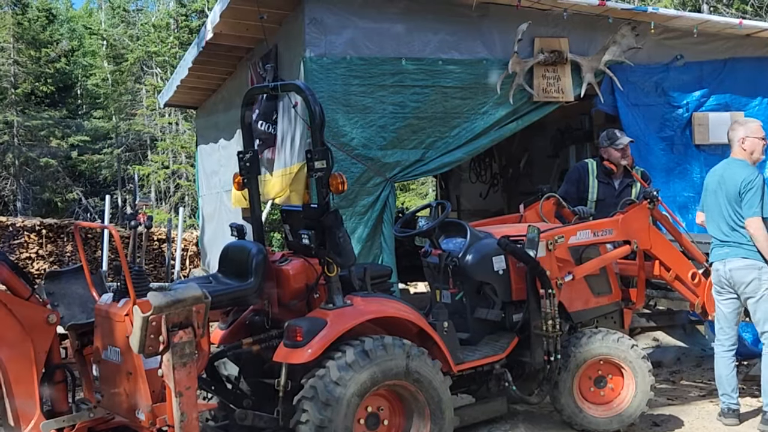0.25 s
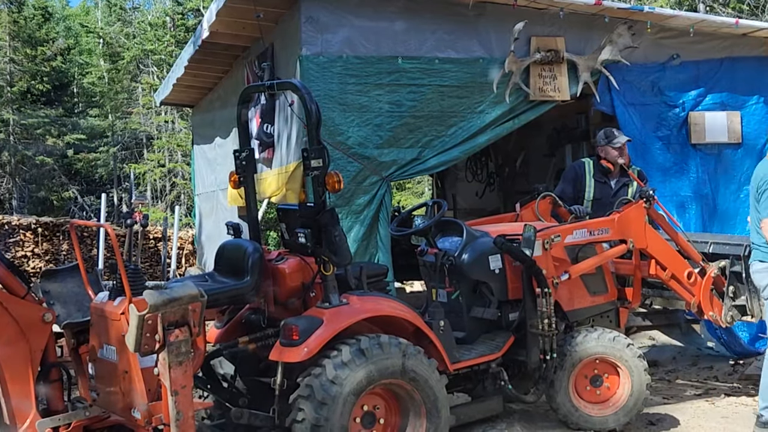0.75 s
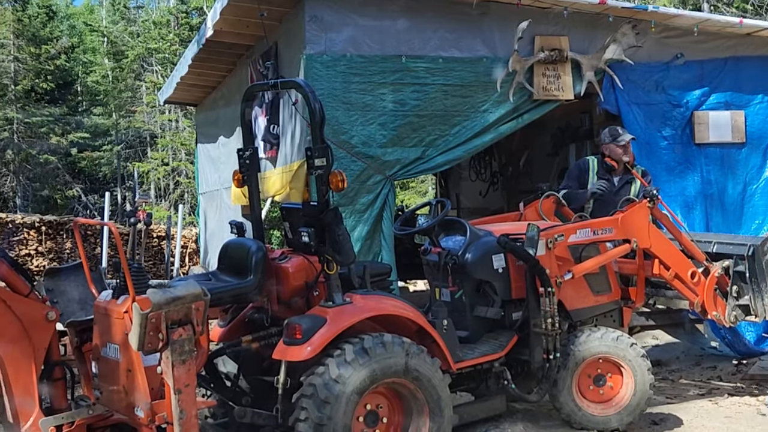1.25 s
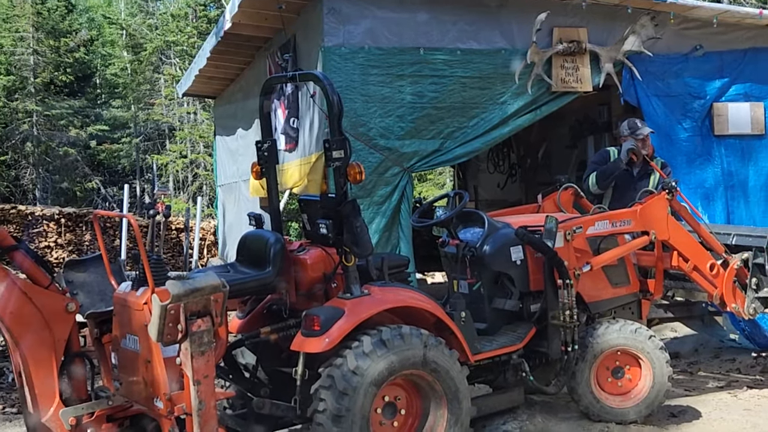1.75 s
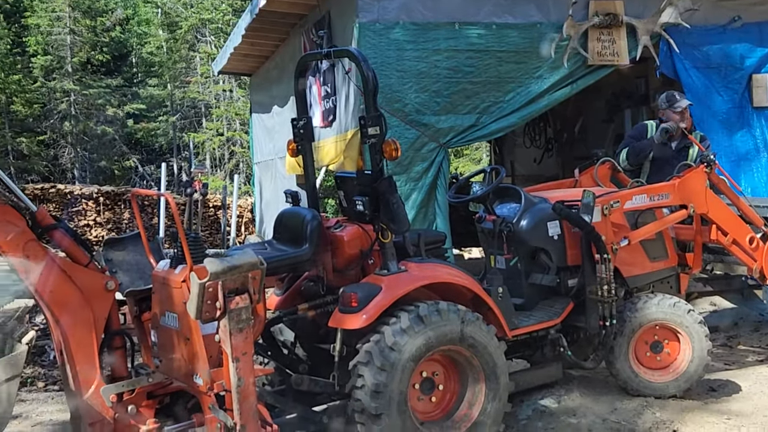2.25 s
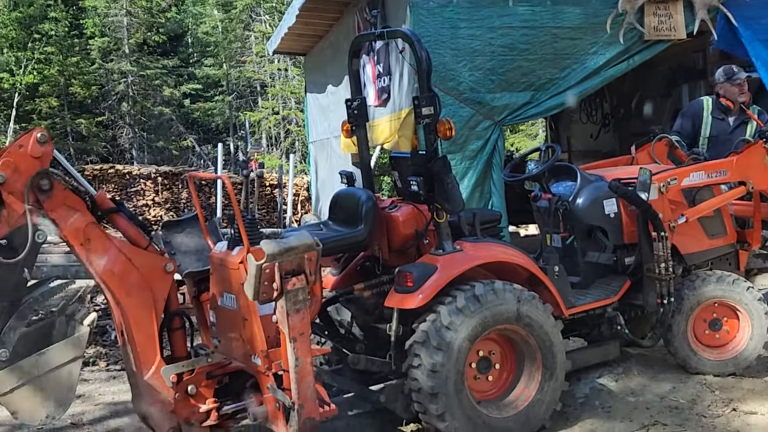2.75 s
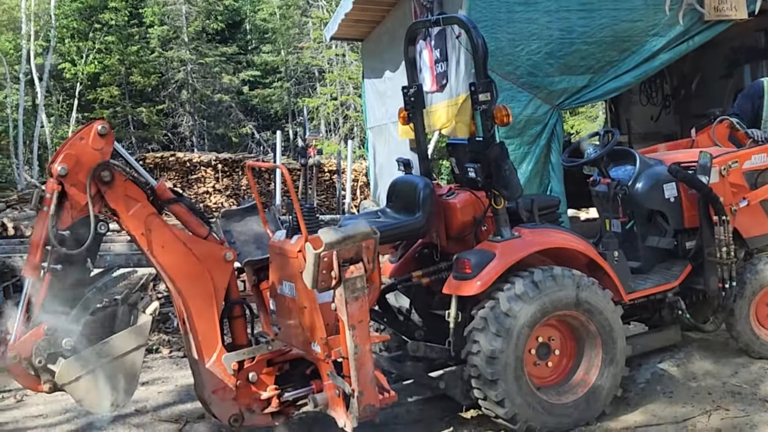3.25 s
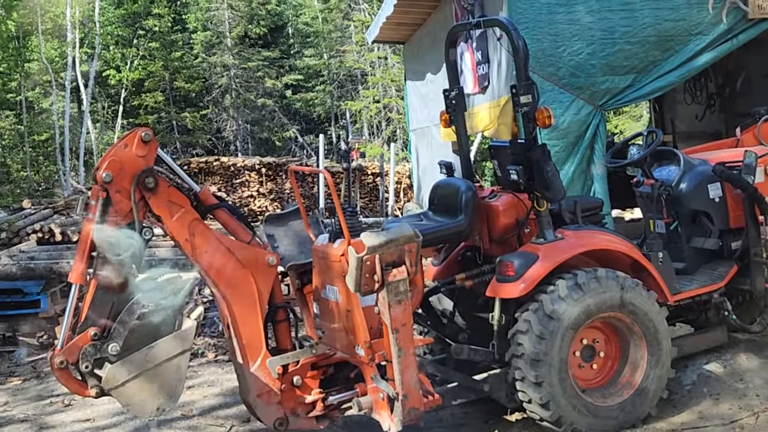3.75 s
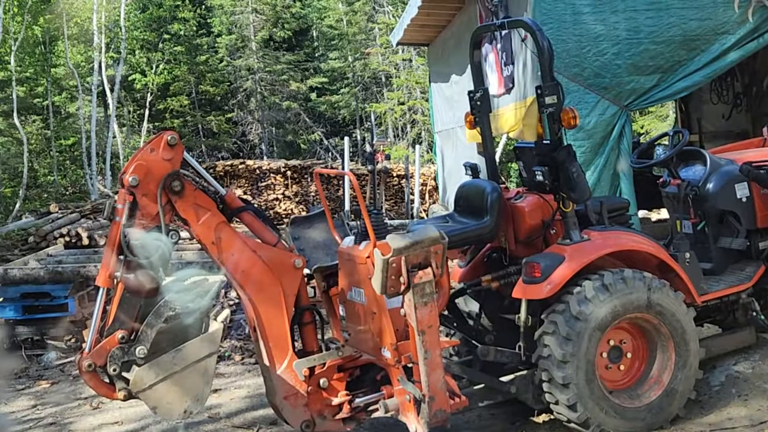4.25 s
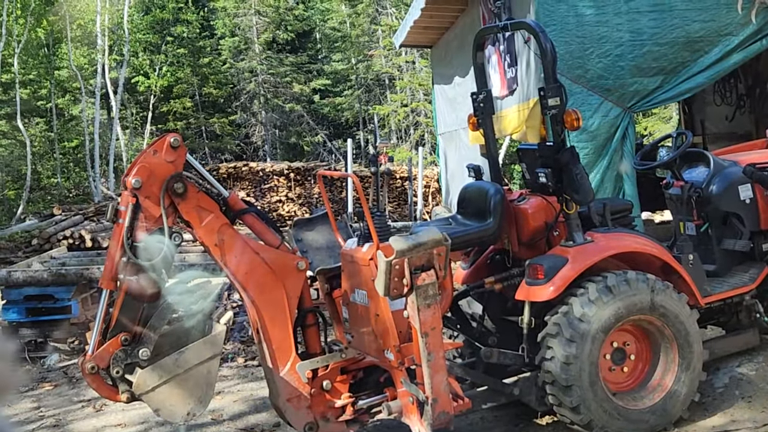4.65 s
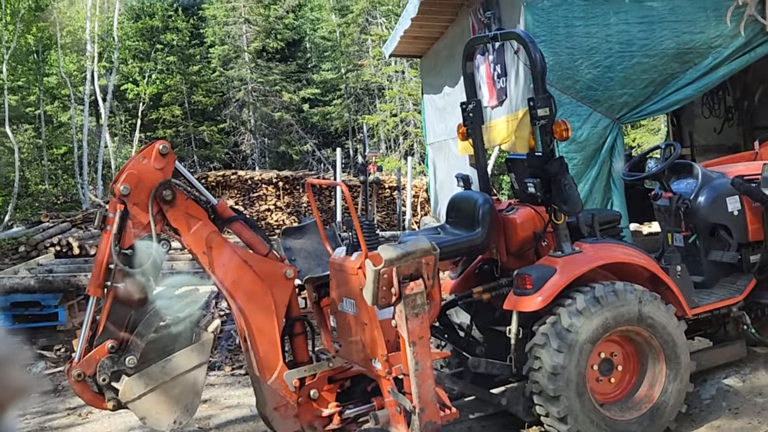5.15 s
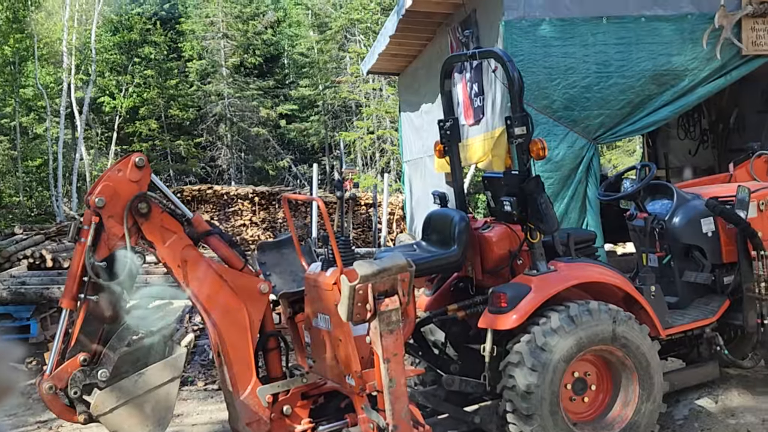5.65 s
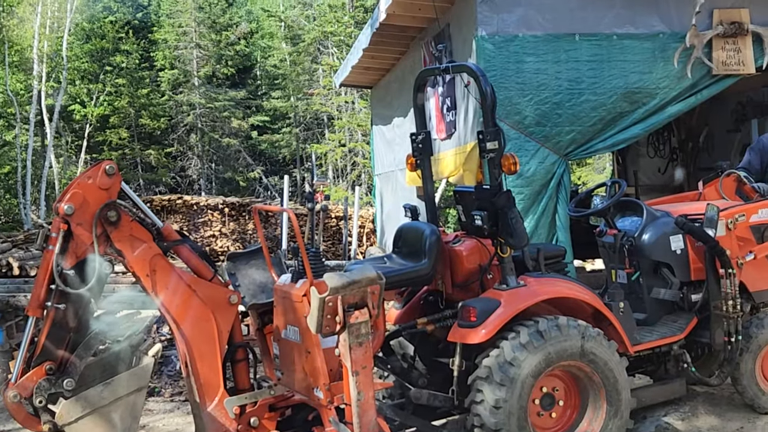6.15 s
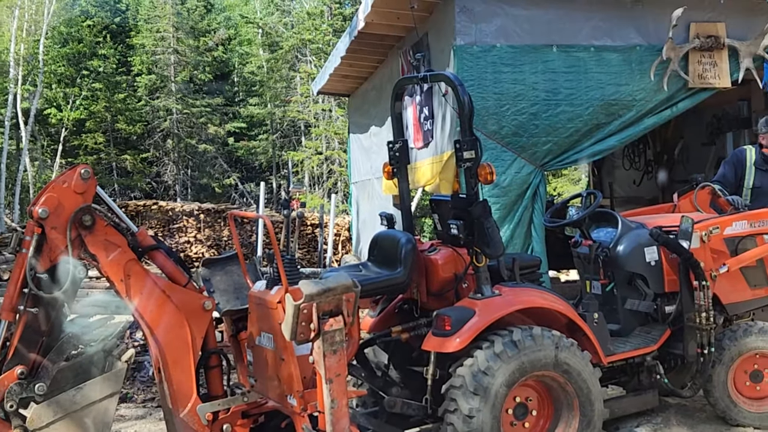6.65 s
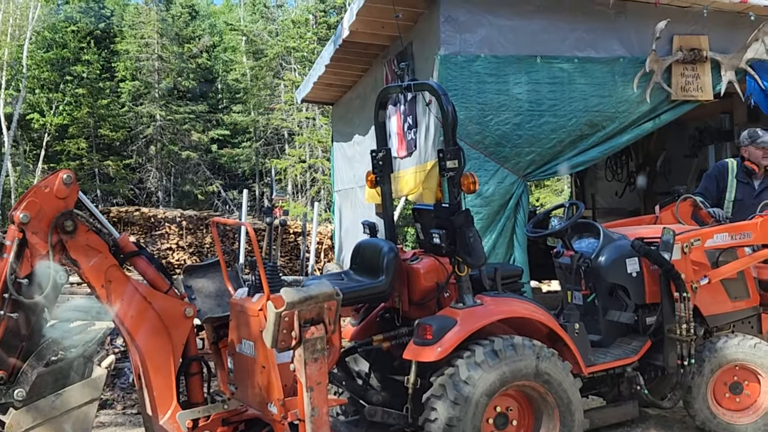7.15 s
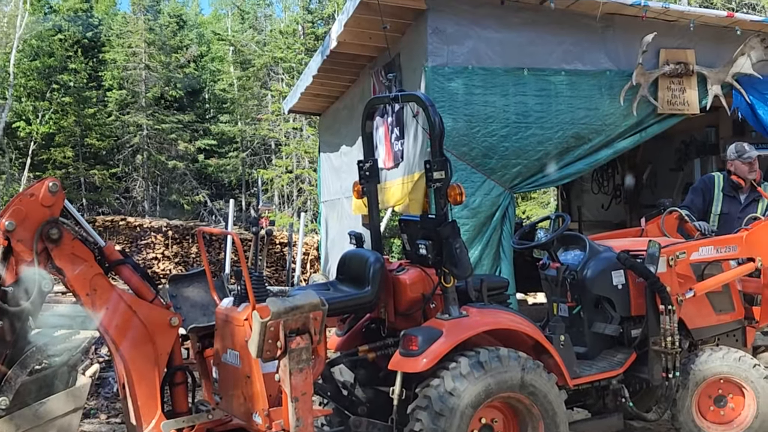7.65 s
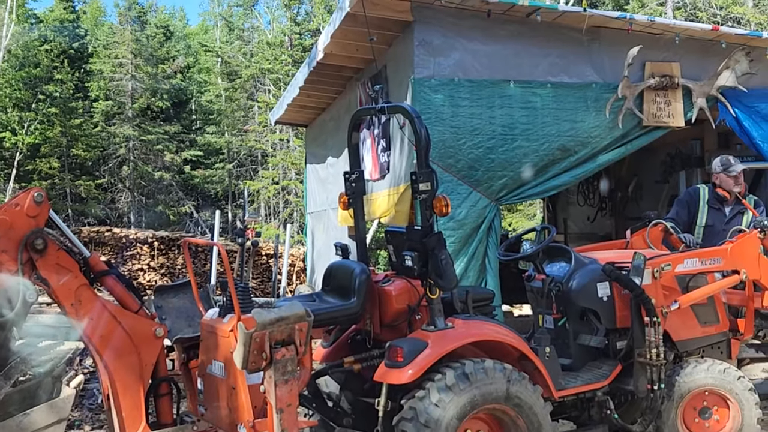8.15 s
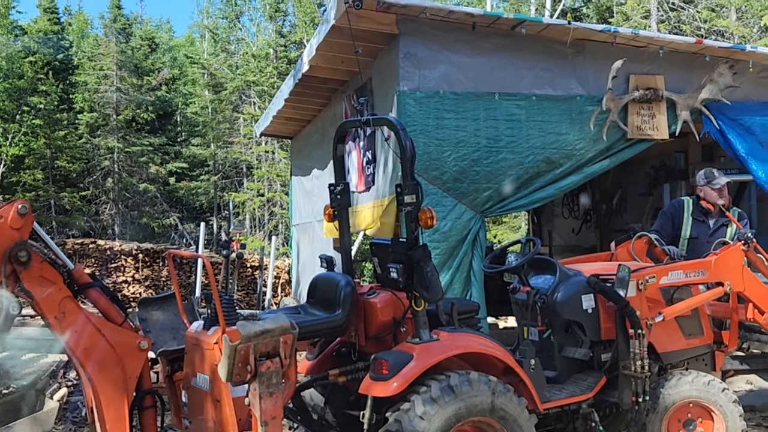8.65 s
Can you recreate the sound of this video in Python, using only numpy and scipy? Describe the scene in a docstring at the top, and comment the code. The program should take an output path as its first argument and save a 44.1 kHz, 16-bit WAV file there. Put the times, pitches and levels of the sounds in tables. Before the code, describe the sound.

Outdoors, a compact tractor's diesel engine roars evenly, bodywork rattling, with dull wind thumps on the left and faint hiss flaring briefly.

```python
"""A small diesel machine roars steadily beside a shed, off to the left of a hand-held phone with two ports.
Resonant noise and faint firing lines make a low rumble, whose bass keeps ducking and returning on the left.
Even noise, slightly roughened by sparse random clicks, rings bodywork and shed as a smeared clatter, changing
colour as the phone turns; a panel rings to a few knocks. Wind thumps the left port with short sinking pulses
and brushes the right once with low noise; a thin band of noise hisses and flares up briefly."""
import sys
import numpy as np
from scipy import signal
from scipy.fft import rfft, irfft, next_fast_len
from scipy.io import wavfile
from scipy.ndimage import uniform_filter1d

SR = 44100
rng = np.random.default_rng(int(sys.argv[2]) if len(sys.argv) > 2 else 0)


def dump(signal):
    """Clip the signal to [-1, 1] and save it as 16-bit WAV at the path in sys.argv[1]."""
    limited = np.clip(np.atleast_2d(signal).T, -1, 1)
    pcm = np.round(limited * 32767).astype(np.int16)
    wavfile.write(sys.argv[1], SR, pcm)


N = 392931
SIZE = next_fast_len(N)
HZ = np.arange(SIZE // 2 + 1) * SR / SIZE
TIME = np.arange(N) / SR

# hiss level at the right port; its flares also lift the rattle: start_s, level_db
HISS_LEVEL = [(0, -84.5), (1.9, -86), (2.12, -81.5), (2.25, -86.5), (2.48, -84.5), (2.58, -80),
              (3.16, -79.5), (3.23, -85), (3.4, -82.5), (3.69, -81), (3.74, -88), (5.3, -87.5), (5.92, -86),
              (6.05, -86), (8.91, -86.5)]
HISS_CALM_DB = -85
# phase by which the left port leads: freq_hz, lead_rad
LEFT_LEAD_PHASE = [(0, 0), (690, 1.34), (990, 1.1), (1075, 2), (1150, 1.6), (1220, 3), (1312, 1.0),
                   (1380, 3.5), (1640, 4.5), (2330, 7), (2580, 8), (3010, 11), (3620, 11), (4390, 15),
                   (6290, 19), (7670, 16.5), (9220, 20.5), (13300, 20.5), (15200, 23.5)]


def amp(db):
    """dB to gain."""
    return 10 ** (np.asarray(db) / 20)


def curves(table):
    """The columns of a table, after the time column, at every sample."""
    s, *columns = np.transpose(table)
    return [np.interp(TIME, s, column) for column in columns]


def noise():
    """Spectrum of white noise."""
    return rfft(rng.standard_normal(SIZE))


def play(spectrum):
    """Sound of a spectrum, rms 1 over all its channels."""
    x = irfft(spectrum, SIZE)[..., :N]
    return x / np.sqrt(np.mean(x ** 2))


def peak(hz, width_hz):
    """Power response of a resonance applied twice."""
    return 1 / (1 + (2 * (HZ - hz) / width_hz) ** 2) ** 2


def colour(points):
    """Gains along (Hz, dB, dB ..) points, one for each dB column, silent outside them."""
    hz, *dbs = np.transpose(points)
    return amp([np.interp(np.log(HZ + 1), np.log(hz), db, left=-200, right=-200) for db in dbs])


def walk(rate_hz):
    """Random levels held for 1 / rate_hz and slewed twice; spread near 1."""
    hold = int(SR / rate_hz)
    steps = np.repeat(rng.standard_normal(N // hold + 1), hold)
    return 1.3 * uniform_filter1d(uniform_filter1d(steps, hold), hold)[:N]


def ports(db, open_db, share, lead_s):
    """Left and right gains: right at db; left open_db over it, falling at once in ducks and creeping back."""
    # left bass ducks, depth before each layer's share: start_s, length_s, depth_db
    duck_events = [(0.154, 0.55, 6), (0.962, 0.48, 6.5), (1.595, 0.2, 5), (2.14, 1.46, 6.5),
                   (4.144, 0.18, 4.5), (4.366, 0.14, 7), (4.771, 0.74, 6), (5.93, 0.29, 6),
                   (6.424, 0.34, 4.5), (7.18, 0.16, 3), (7.807, 0.23, 4.5), (8.161, 0.3, 6),
                   (8.52, 0.62, 5.5)]
    fall_s, rise_s = 0.012, 0.099
    duck_db = np.zeros(N)
    for start_s, length_s, depth_db in duck_events:
        end_s = start_s + max(length_s - lead_s, 2 * fall_s)  # lead_s: how much earlier the layer is back
        knee_s = max(end_s - rise_s, start_s + fall_s)
        shape = np.interp(TIME, [start_s, start_s + fall_s, knee_s, end_s], [0, 1, 1, 0])
        duck_db = np.maximum(duck_db, depth_db * shape)
    return amp(db + np.array([open_db - share * duck_db, np.zeros(N)]))


def even(x):
    """Divides out part of the chance swells that the two ports share."""
    evenness, span_s = 0.23, 0.082
    swell = uniform_filter1d(np.mean(x ** 2, axis=0), int(span_s * SR))
    x = x / (swell + 0.018) ** (evenness / 2)
    return x / np.sqrt(np.mean(x ** 2))


def rumble():
    """Turbulent noise rings low resonances; both ports hear nearly the same pressure."""
    # deep rumble at the right port: start_s, level_db
    deep_level = [(0.03, -28), (0.12, -31.5), (0.3, -35.5), (0.82, -30), (1.0, -35.5), (1.25, -29),
                  (1.6, -33.5), (2.02, -27.5), (2.22, -35.5), (2.45, -29.5), (2.7, -35), (2.95, -30),
                  (3.4, -33.5), (4.15, -30.5), (4.34, -26), (4.41, -31), (4.51, -30), (4.62, -35.5),
                  (4.75, -29), (5.0, -32), (5.75, -30.5), (5.95, -32), (6.7, -33.5), (6.85, -27),
                  (7.05, -31), (7.17, -28.5), (7.3, -33), (7.7, -28.5), (7.9, -34), (8.91, -32)]
    # deep resonances, the first two the lowest: freq_hz, width_hz, gain_db
    deep_modes = [(37, 9.2, -14), (53.6, 13, -8), (67.3, 12, 0), (85.7, 19, 3.5), (101.4, 15, -2.5),
                  (113.2, 11, 0), (130.3, 14.1, -4.5)]
    # upper resonances: freq_hz, width_hz, gain_db
    upper_modes = [(166.6, 32.4, 0.5), (188.4, 24, -2), (210.5, 24, -5.5), (234.7, 35.4, -3),
                   (269.6, 52, -15.5)]
    # likeness of the two ports: freq_hz, likeness_0_to_1
    port_likeness = [(25, 0.9), (45, 0.6), (65, 0.93), (130, 0.93), (250, 0.87)]
    lowest_db, upper_mean_db = -10, -43  # lowest is relative to deep
    upper_follows = 0.18  # share of the deep swells
    # open_db, duck share, lead_s
    lowest_duck, deep_duck, upper_duck = (6.6, 2.2, 0.001), (2.93, 1.08, 0.001), (1.3, 0.54, 0.041)

    deep_db, = curves(deep_level)
    upper_db = upper_mean_db + upper_follows * (deep_db - deep_db.mean())
    alike = np.clip(np.interp(HZ, *np.transpose(port_likeness)), 0, 1)
    shared = noise()
    push = np.array([shared, alike * shared + np.sqrt(1 - alike ** 2) * noise()])

    def ring(modes):
        """The push through a set of resonances, summed in power."""
        power = sum(amp(db) ** 2 * peak(hz, width_hz) for hz, width_hz, db in modes)
        return even(play(push * np.sqrt(power)))

    lowest = ring(deep_modes[:2]) * ports(deep_db + lowest_db, *lowest_duck)
    deep = ring(deep_modes[2:]) * ports(deep_db, *deep_duck)
    upper = ring(upper_modes) * ports(upper_db, *upper_duck)
    return lowest + deep + upper


def tones():
    """Multiples of a slightly wandering firing rate, and a steady-pitched hum; both duck on the left."""
    # firing lines at the right port: multiple_of_firing_rate, level_db
    firing_orders = [(1, -49.5), (2, -37.5), (3, -43.5), (4, -52), (6, -56.5), (7, -58)]
    # hum at the right port: start_s, level_db
    hum_level = [(0, -40.5), (2, -46), (4, -40), (4.3, -44), (8.91, -51.5)]
    firing_hz, hum_hz = 34.87, 40
    lines_open_db, hum_open_db = 4, -3.5
    duck_share, lead_s = 1.42, 0.001

    firing_rad = 2 * np.pi * np.cumsum(firing_hz * (1 + 0.0015 * walk(1))) / SR
    lines = sum(amp(db + walk(2.2)) * np.sin(order * firing_rad + 2 * np.pi * rng.random())
                for order, db in firing_orders)
    hum = amp(curves(hum_level)[0]) * np.sin(2 * np.pi * hum_hz * TIME)
    both = lines * ports(0, lines_open_db, duck_share, lead_s) + hum * ports(0, hum_open_db, duck_share, lead_s)
    return np.sqrt(2) * both  # levels are rms


def grainy_noise():
    """Spectrum of even noise with sparse random clicks that roughen it slightly."""
    clicks_per_s, clicks_db = 250, -9.5  # power beside the even noise
    hits = rng.random(SIZE) < clicks_per_s / SR
    clicks = hits * rng.standard_normal(SIZE) * np.sqrt(SR / clicks_per_s)
    return noise() + amp(clicks_db) * rfft(clicks)


def clatter():
    """Grainy noise rings bodywork and shed; the right port hears the direct share later, the rest is its own."""
    # bodywork and shed resonances, facing the shed and turned away:
    # freq_hz, width_hz, facing_left_db, facing_right_db, away_left_db, away_right_db, likeness_0_to_1
    body_modes = [(399.5, 206, -1.5, 0, 0, 0.5, 0.54), (527, 66, -7.5, -1, -2, -3, 0.78),
                  (660.5, 147, -1.5, -1.5, -1, -1, 0.78), (761, 50, 2, 2, -0.5, 0, 0.89),
                  (821, 32, -14.5, -12, -10, -8, 0.88), (898, 80, -1, -2.5, -6.5, -8.5, 0.94),
                  (997, 92, -2, -0.5, -7.5, -3.5, 0.75), (1139, 170, -7, -6.5, -2.5, -7.5, 0.33),
                  (1260, 84, -8, 2, -6.5, -2.5, 0.69), (1308, 38, 0, -1.5, -7.5, -10.5, 0.89),
                  (1368, 60, -0.5, -11.5, -4, -9, 0.63), (1465, 46, -3, -5, -9, -7.5, 0.5),
                  (1530, 480, -17, -12, -14.5, -12, 0.29), (1558, 100, -9.5, -6.5, -8.5, -8, 0.45),
                  (1800, 510, -18.5, -18.5, -20, -15, 0.89), (1904, 170, -15.5, -12.5, -12.5, -12, 0.33),
                  (2035, 120, -14, -16, -11.5, -14.5, 0.2), (2180, 260, -21.5, -23.5, -18.5, -28, 0.51),
                  (2315, 210, -20, -16.5, -18.5, -16.5, 0.45), (2464, 70, -17, -17, -20.5, -16, 0.44),
                  (2550, 45, -19.5, -23, -28, -14.5, 0.66), (2720, 260, -18.5, -23, -17, -14, 0.46),
                  (2910, 110, -21, -21.5, -18.5, -21, 0.39), (3016, 61, -29, -21.5, -28, -21.5, 0.37),
                  (3160, 320, -24, -24.5, -26, -26.5, 0.19), (3470, 150, -23, -20.5, -23, -24, 0.28),
                  (3695, 435, -25, -28.5, -25.5, -20.5, 0.33), (4000, 380, -31, -22, -28, -27.5, 0.18),
                  (4240, 130, -28, -34.5, -24.5, -28.5, 0.38), (4300, 140, -27.5, -26, -27.5, -29, 0.37),
                  (4516, 280, -32, -28, -32, -29.5, 0.05), (4790, 440, -33, -35, -34, -31.5, 0.12),
                  (5320, 950, -34, -33, -33.5, -38, 0.25)]
    # narrow bands altered by echoes: freq_hz, width_hz, left_db, right_db
    echo_dips = [(367, 34, -3, 0.5), (481, 46, -3.5, -4.5), (616, 37, -3, -3), (1190, 37, -2.5, -0.5),
                 (1363, 47, -1.5, -2), (1512, 37, -6, -5.5), (2310, 79, -1.5, -3.5), (2800, 50, -5, -3.5)]
    # the phone swings round: start_s, turn_0_facing_to_1_away
    phone_turn = [(0, 0.36), (2.2, 0.2), (3.6, 0.92), (8.91, 0.73)]
    split_hz, rattle_hz = 900, 2200
    # right port: facing_db, away_db
    low_levels, high_levels, rattle_levels = (-53, -53.5), (-57.5, -59), (-63, -62)
    rattle_follows = 0.33  # share of the hiss flares
    # open_db, duck share, lead_s
    low_duck, high_duck, rattle_duck = (1.8, 0.5, 0.052), (0.67, 0.15, 0.08), (0.09, 0.033, 0.08)

    hz, width_hz, *dbs, alike = np.transpose(body_modes)
    peaks = np.array([peak(f, w) for f, w in zip(hz, width_hz)], dtype=np.float32)
    power = amp(np.array(dbs)) ** 2 @ peaks
    dips = amp(sum(np.outer([left_db, right_db], peak(f, w)) for f, w, left_db, right_db in echo_dips))
    direct = np.clip(np.interp(HZ, hz, alike), 0, 1)
    lag = np.exp(-1j * np.interp(HZ, *np.transpose(LEFT_LEAD_PHASE)))
    shared = grainy_noise()
    push = dips * np.array([shared, direct * lag * shared + np.sqrt(1 - direct ** 2) * noise()])
    spectra = np.sqrt(power).reshape(2, 2, -1) * push  # facing or away, left or right

    low_share = 1 / (1 + (HZ / split_hz) ** 6)
    rattle_share = 1 - 1 / (1 + (HZ / rattle_hz) ** 6)
    high_share = 1 - low_share - rattle_share
    turn, = curves(phone_turn)

    def turned(facing, away):
        """Crossfade as the phone turns."""
        return (1 - turn) * facing + turn * away

    low, high, rattle = (turned(*play(spectra * share)) for share in (low_share, high_share, rattle_share))
    low_db = turned(*low_levels) + 0.43 * walk(30)
    high_db = turned(*high_levels) + 0.98 * walk(25)
    flare_db = curves(HISS_LEVEL)[0] - HISS_CALM_DB
    rattle_db = turned(*rattle_levels) + rattle_follows * flare_db + 0.7 * walk(22)
    return (low * ports(low_db, *low_duck) + high * ports(high_db, *high_duck)
            + rattle * ports(rattle_db, *rattle_duck))


def pair():
    """Spectra of noise that the ports partly share, later on the right."""
    alike = 0.45
    shared = noise()
    lag = np.exp(-1j * np.interp(HZ, *np.transpose(LEFT_LEAD_PHASE)))
    return np.array([shared, alike * lag * shared + np.sqrt(1 - alike ** 2) * noise()])


def hiss():
    """Two bands of fine noise, stronger on the left when calm; flicker is mostly right and grows with flares."""
    # main band: freq_hz, left_db, right_db
    band_colour = [(5500, -12.5, -10), (6160, 0, -2), (6660, -4.5, -1), (7370, 2.5, 1.5), (8000, 1, -5.5),
                   (8550, -1.5, 1), (9140, -18, -7), (9500, -28, -16.5)]
    # top band: freq_hz, left_db, right_db
    top_colour = [(8000, -17, -23), (9200, -3.5, -2), (9720, -4.5, -1), (11500, 1, 3.5), (13500, 1.5, -2),
                  (16000, 4.5, -2.5)]
    band_pan_db, top_pan_db = 11.5, 4.5  # left over right, calm
    left_follows = 0.64  # left share of the band's flares
    top_calm_db = -88

    right_db, = curves(HISS_LEVEL)
    flare_db = right_db - HISS_CALM_DB
    band, top = (play(colour(points) * pair()) for points in (band_colour, top_colour))
    flicker_db = (1.8 + 0.03 * np.clip(flare_db, 0, 10)) * walk(35)
    left_db = HISS_CALM_DB + band_pan_db + left_follows * flare_db
    band = band * amp([left_db, right_db])
    top = top * amp(top_calm_db + flare_db + np.array([[top_pan_db], [0]]))
    return (band + top) * amp(np.outer([0.4, 1.1], flicker_db))


def knocks():
    """Each engine knock swells quickly and rings out in a panel, never quite at the same pitch."""
    # knocks, pan is left over right: start_s, gain_db, pan_db
    knock_events = [(0.043, -56, 4), (0.166, -46, 0.0), (0.31, -43, -0.5), (1.087, -44, -5),
                    (1.285, -47.5, 0), (1.465, -53, 4), (2.104, -45, -4.0), (3.009, -46, -4),
                    (3.301, -55, 0.5), (3.883, -47, 1), (5.355, -43, 1), (5.774, -53, 2.5), (5.833, -55, 5),
                    (6.249, -50, 5), (7.38, -51, 2)]
    # panel modes, ring is the time to fall 60 dB: freq_hz, gain_db, ring_s
    panel_modes = [(754, 0, 0.1), (644, -12, .04), (1330, -12, .05)]
    rise_s, pitch_spread = 0.0036, 0.012  # spread as a fraction of pitch

    out, t = np.zeros((2, N + SR)), TIME[:SR // 4]
    onset = 1 - np.exp(-t / rise_s)
    chance = rng.standard_normal((len(knock_events), len(panel_modes)))
    for (start_s, db, pan_db), shifts in zip(knock_events, chance):
        ring = np.zeros(len(t))
        for (hz, mode_db, ring_s), shift in zip(panel_modes, shifts):
            pitch_hz = hz * (1 + pitch_spread * shift)
            ring += amp(mode_db - 60 * t / ring_s) * np.sin(2 * np.pi * pitch_hz * t)
        start = int(start_s * SR)
        gains = amp(db + np.array([pan_db, -pan_db]) / 2)
        out[:, start:start + len(t)] += np.outer(gains, ring * onset)
    return out[:, :N]


def thumps():
    """Wind slaps the left port: a cycle or two round a sharp dip, sinking in pitch as it fades."""
    # thumps, timed and pitched at the dip, gain before colouring: dip_s, gain_db, pitch_hz
    thump_events = [(0.142, -15, 183), (0.939, -15, 171), (1.494, -18.5, 121), (1.924, -20, 140),
                    (2.012, -16, 100), (3.626, -22.5, 170), (4.116, -23, 140.5), (4.353, -24.5, 121),
                    (4.512, -19, 130.4), (4.739, -14, 169), (5.216, -29, 260), (5.478, -19, 165),
                    (5.558, -18, 138), (5.821, -13.5, 99.4), (6.23, -16, 130.6), (6.286, -18.5, 109.5),
                    (6.323, -16.5, 109), (6.437, -24.5, 170), (6.82, -18, 89.7), (7.166, -13.5, 105),
                    (7.719, -13, 95), (8.029, -18, 139)]
    # thump colour: freq_hz, gain_db
    thump_colour = [(10, -0.5), (240, 1), (300, -8), (380, 3), (600, -8), (2000, -21)]
    rise_cycles, fade_cycles = 0.44, 1.3
    sag_per_cycle, right_db = 0.64, -28  # right relative to left

    out = np.zeros(N)
    for dip_s, db, hz in thump_events:
        near = slice(int((dip_s - 0.04) * SR), int((dip_s + 0.04) * SR))
        cycles = (TIME[near] - dip_s) * hz
        envelope = np.exp(-(cycles / np.where(cycles < 0, rise_cycles, fade_cycles)) ** 2)
        sagged = cycles / (1 + sag_per_cycle * np.clip(cycles, 0, None))
        out[near] += amp(db) * envelope * -np.cos(2 * np.pi * sagged)
    out = irfft(rfft(out, SIZE) * colour(thump_colour)[0], SIZE)[:N]
    return out * amp([[0], [right_db]])


def gust():
    """Wind brushes the right port alone: low noise with a rough level."""
    # gust at the right port: start_s, level_db
    gust_level = [(0, -70.5), (2.5, -76), (2.7, -46.5), (2.85, -53.5), (2.95, -49.5), (3.3, -55),
                  (3.5, -83), (8.91, -78.5)]
    # gust colour: freq_hz, gain_db
    gust_colour = [(200, -0.5), (300, 4), (420, -3), (600, -10)]
    db, = curves(gust_level)
    rough = play(colour(gust_colour)[0] * noise()) * amp(db + 2.0 * walk(25))
    return rough * np.array([[0], [1]])


def scene():
    """All sources at the two ports."""
    return rumble() + tones() + clatter() + hiss() + knocks() + thumps() + gust()


def record(dry):
    """The phone cuts the top with a steep low-pass."""
    top_hz = 15720
    return signal.sosfilt(signal.ellip(14, 0.2, 80, top_hz, fs=SR, output="sos"), dry)


dry = scene()
out = record(dry)
dump(out)
```